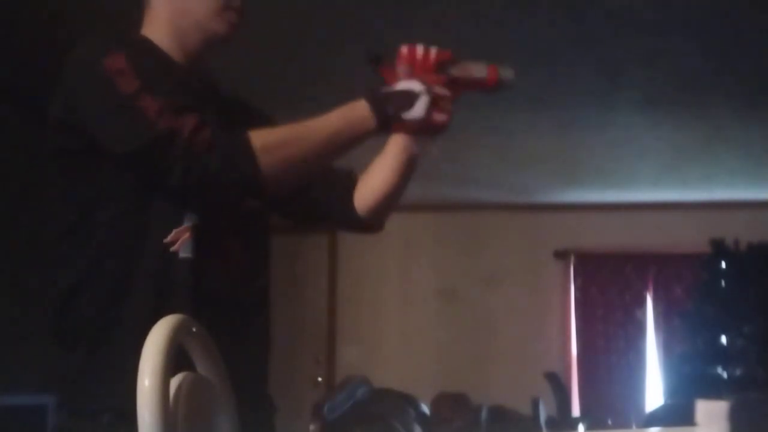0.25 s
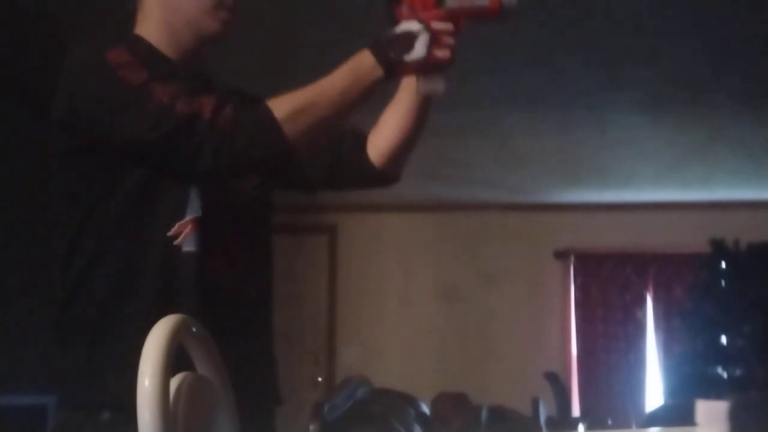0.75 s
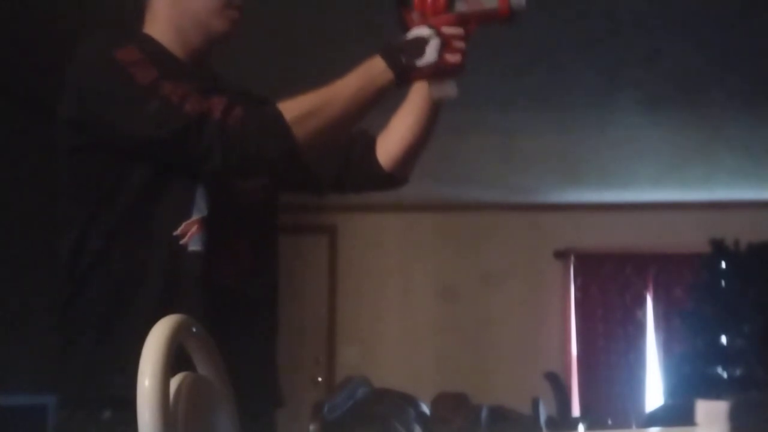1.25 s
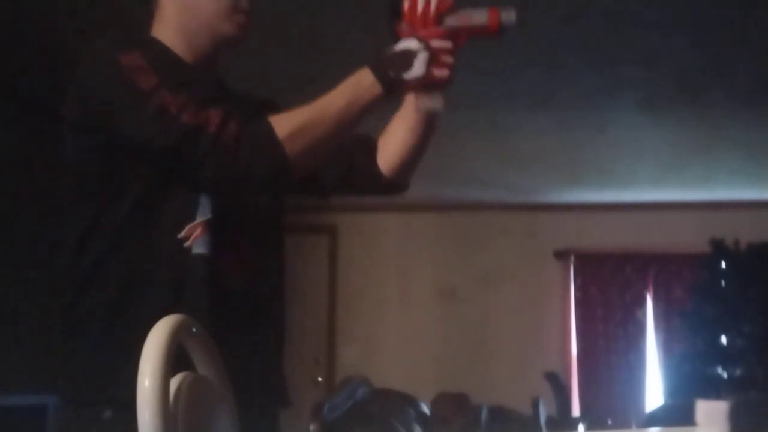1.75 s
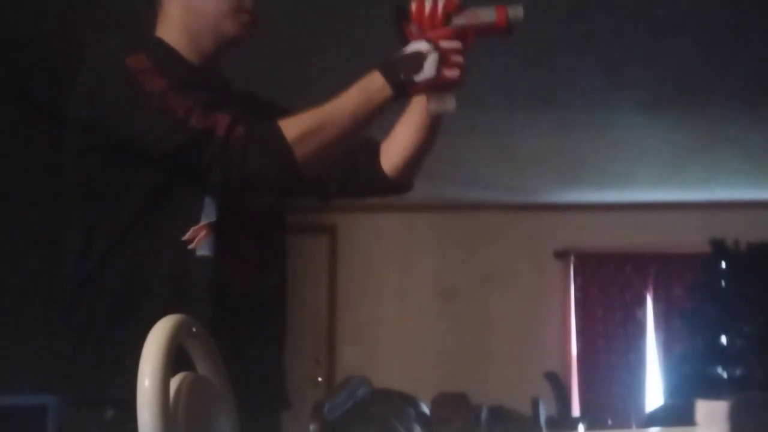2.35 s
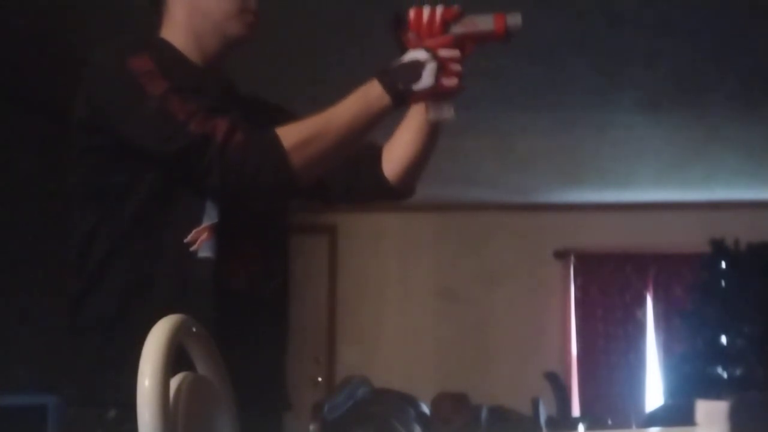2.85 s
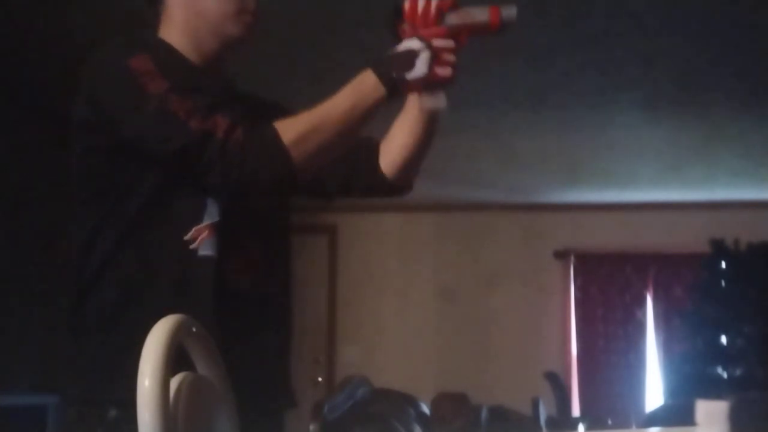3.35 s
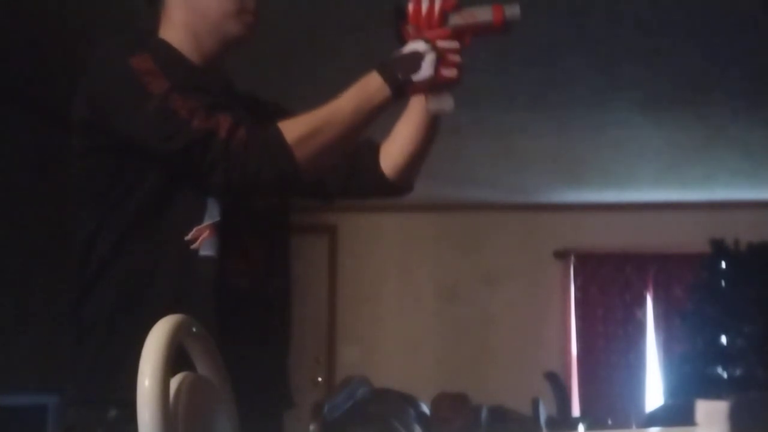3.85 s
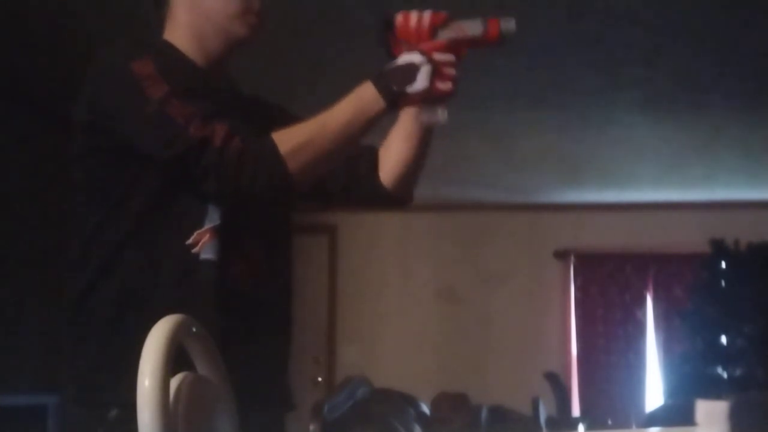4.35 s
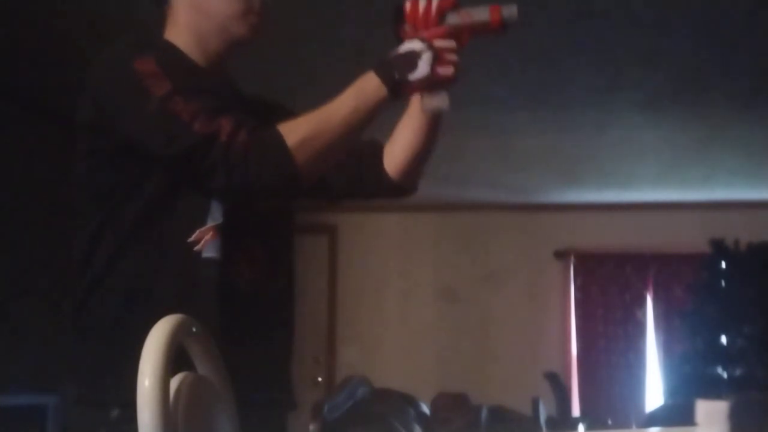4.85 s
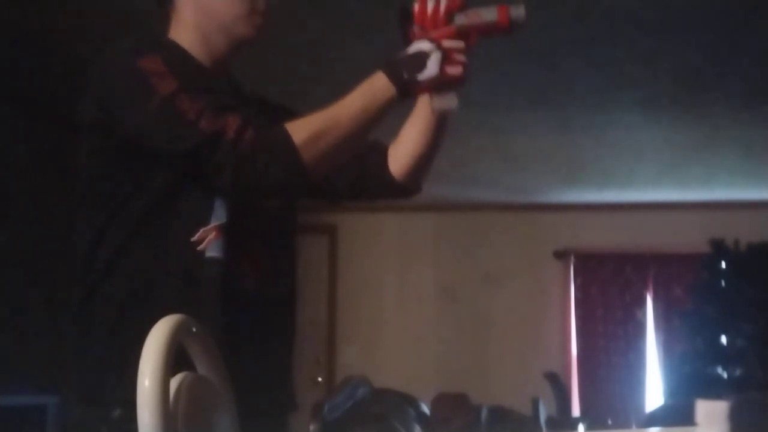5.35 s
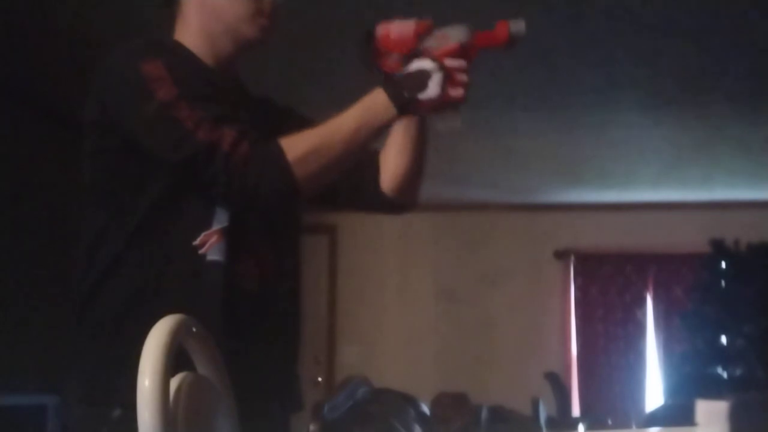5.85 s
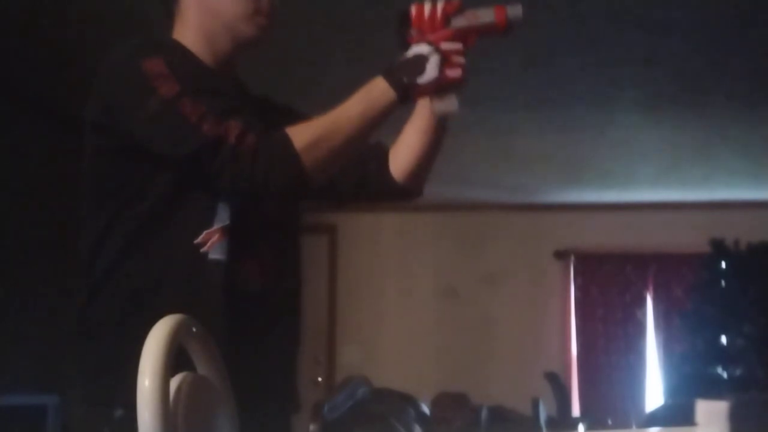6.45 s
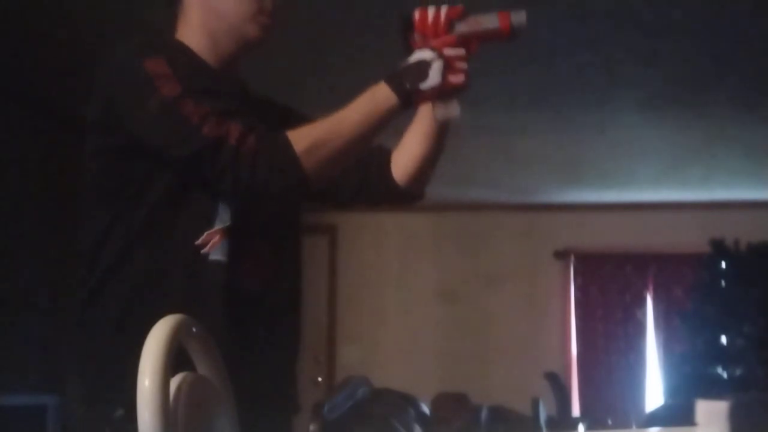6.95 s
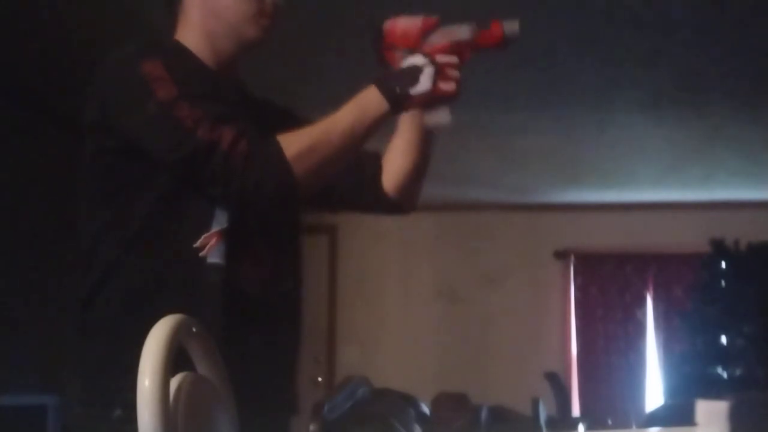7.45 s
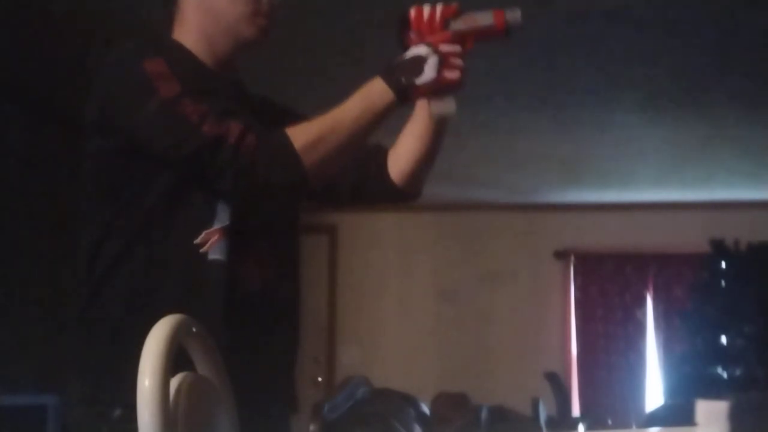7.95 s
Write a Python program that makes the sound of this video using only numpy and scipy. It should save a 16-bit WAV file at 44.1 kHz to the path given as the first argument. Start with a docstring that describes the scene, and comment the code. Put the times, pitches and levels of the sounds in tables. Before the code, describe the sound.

Repeated firing and cocking of a plastic toy blaster, heard nearby with short lively room echo. The opening catches the tail of a shot; five more follow, the last much weaker. Between them come high scratchy squeaks, small snags, dull hand knocks and bright hollow slide clacks, the loudest sounds. A small click ends it over a very quiet low room hum.

```python
"""Spring-powered toy blaster in a small room

A blaster is fired and re-cocked about every 1.4 s in a small, quiet room. Each cycle: the trigger clicks,
the plunger pops a dart out, the slide is pulled back with a rising squeak, then runs forward and clacks home.
Hits are filtered noise bursts with ringing modes; squeaks are unsteady tones whose pitch follows slide speed.
The muzzle points at a wall, so the pops are heard mostly through the room; a faint rumble and hum lie below."""
import sys
import numpy as np
from scipy import signal
from scipy.fft import rfft, irfft
from scipy.io import wavfile
from scipy.ndimage import uniform_filter1d

SR = 44100
rng = np.random.default_rng(int(sys.argv[2]) if len(sys.argv) > 2 else 0)


def materialize(psi):
    """Save the field psi as 16-bit PCM at rate SR to the path in sys.argv[1].

    A 1-D psi becomes a single channel; in a 2-D psi each row is a channel.
    """
    bounded = np.clip(np.atleast_2d(psi).T, -1, 1)
    quanta = np.round(bounded * 32767).astype(np.int16)
    wavfile.write(sys.argv[1], SR, quanta)


N = 361619  # samples in the scene
LEAD = SR // 5  # samples ahead of the scene, for sounds already under way when it starts
PRE = 32  # samples of room response ahead of the direct sound
# pitch follows speed over a fixed travel, so a push lasts this many cycles of its top pitch
PUSH_CYCLES = 645


def shot(db, rattle_db, tilt_db, pop_tilt_db, slam_s=.0042, slam_db=2, ring_db=-9):
    """Impulsive excitation: an air pulse pops and rings the tube; the spring rattles and the plunger slams."""
    # spectrum of the air pulse in barrel and plunger tube: [f/Hz, level/dB]
    pop_spectrum = [(25, -56), (55, -35.5), (85, -4.5), (150, -9.5), (200, -11.5), (300, -16), (390, -6),
                    (470, -9), (570, -2.5), (660, -3.5), (780, -7), (920, -4.5), (1300, -25.5), (3000, -42)]
    # ringing of the plunger tube and spring: [f/Hz, level/dB, t60/s]
    tube_modes = [(160.6, -11.5, 0.33), (390.6, -8.5, 0.31), (523, 2, 0.033), (640, 4.5, 0.038),
                  (923, -7.5, 0.13), (2190, -11, .06), (2690, -10, 0.069), (3700, -13.5, 0.025)]
    # spectrum of the spring and plunger rattle: [f/Hz, level/dB]
    rattle_spectrum = [(200, -21), (700, -10), (1200, 7), (1700, 1), (2100, 5.5), (2500, 1.5), (3500, -1.5),
                       (4100, -6), (5200, -6), (8000, -16), (11500, -23), (15500, -17)]

    puff = contact(.008, -15.0)
    pop = unit(colour(puff, pop_spectrum, pop_tilt_db))
    pop = pop + from_db(ring_db) * ring(puff, tube_modes)
    slam = delayed(contact(0.032, 6.6), slam_s)
    rattle = contact(0.0038, 2.6) + from_db(slam_db) * slam
    rattle = colour(rattle, rattle_spectrum, tilt_db)
    return blow(pop, db) + blow(rattle, db + rattle_db)


def clack(db, tilt_db, ring_db=-10, bounce_s=0.004, bounce_db=-4):
    """Impact with one rebound: the slide strikes the hollow shell, whose modes ring briefly."""
    # spectrum of the shell when the slide slams: [f/Hz, level/dB]
    shell_spectrum = [(25, -64.5), (70, -39), (300, -27), (480, -17), (600, -10.5), (740, -16),
                      (1100, -3.5), (1300, -9), (1800, -0.5), (2300, -7.5), (2800, -13), (4900, -16.5),
                      (7300, -26.5), (11000, -37.5), (15000, -32.5)]
    # ringing of the shell: [f/Hz, level/dB, t60/s]
    shell_modes = [(578, -9, 0.28), (1050, -27.5, .04), (1458, 10.5, 0.15), (1630, 2, 0.032),
                   (1900, -2.5, 0.047), (2773, 5.5, 0.067), (3740, -7.5, 0.026)]

    bounce = delayed(judder(), bounce_s * rng.uniform(.85, 1.15))
    hit = even(judder() + from_db(bounce_db) * bounce, width_bins=3)
    body = unit(colour(hit, shell_spectrum, tilt_db))
    return blow(body + from_db(ring_db) * ring(hit, shell_modes), db)


def judder(rise_s=0.00056, decay_s=0.0034):
    """Random micro-impacts: a dense run of contacts as two plastic faces seat against each other."""
    t = seconds(1 / 8)
    return even(rng.standard_normal(len(t)) * (1 - np.exp(-t / rise_s)) * np.exp(-t / decay_s))


def pull(top_hz, squeak_db, whistle_db, rub_db):
    """Stick-slip at rising speed: the squeak climbs, then jumps to a short steady whistle of the seal."""
    travel_s = 580 / top_hz  # a fixed travel lasts this many cycles of the top pitch
    start_hz, reach = 1060, .88  # initial pitch; share of the top pitch at the end of the travel
    swell_db, loudest, ease_db = 15.5, .3, 4  # swell up to this share of the travel, then easing off
    whistle_s, attack_s, fade_db_per_s = .04, 0.0024, 650

    t = seconds(travel_s + whistle_s)
    pitch = np.interp(t, [0, travel_s], [start_hz, reach * top_hz])
    effort_db = np.interp(t / travel_s, [0, loudest, 1], [-swell_db, 0, -ease_db])
    held_s = np.maximum(t - travel_s, 0)
    arrived = np.minimum(held_s / attack_s, 1)
    whistle = strand(np.full(len(t), 1. * top_hz), drift=0.02)
    whistle = whistle * from_db(whistle_db - fade_db_per_s * held_s)
    tone = (1 - arrived) * squeak(pitch, squeak_db + effort_db) + arrived * whistle
    rub = rails(len(t), top_hz, rub_db, swell_db=18)
    return (tone + rub) * signal.windows.tukey(len(t), .06)


def push(top_hz, squeak_db, rub_db):
    """Stick-slip at uneven speed: a chirp as the slide is nudged loose, a hesitation, a squeaking run home."""
    # course of a push: [share of its duration, share of top speed, squeak level/dB]
    course = [(0, .17, -6.5), (.1, .33, -1), (.2, .42, -3.5), (.38, 0.24, -11), (.58, .53, -8.5),
              (.74, .82, -1), (.86, 1, -1), (1, .94, -0.5)]

    t = seconds(PUSH_CYCLES / top_hz)
    share, speed, effort_db = np.transpose(course)
    way = t / t[-1]
    pitch = top_hz * np.interp(way, share, speed)
    tone = squeak(pitch, squeak_db + np.interp(way, share, effort_db))
    rub = rails(len(t), top_hz, rub_db, swell_db=16.5)
    return (tone + rub) * signal.windows.tukey(len(t), .06)


def squeak(pitch, db, body_hz=2710, body_octaves=0.27, boost_db=4.5):
    """Resonant radiation: two patches of the seal squeak together, boosted near the shell's resonance."""
    body_db = boost_db / (1 + (np.log2(pitch / body_hz) / body_octaves) ** 2)
    return (strand(pitch) + strand(pitch)) / np.sqrt(2) * from_db(db + body_db)


def strand(pitch, jitter=.035, drift=.025, flutter_db=4, second_db=-12, third_db=-24):
    """Stick-slip oscillation of one patch of the seal: an unsteady tone with weak overtones."""
    n = len(pitch)
    unsteady = jitter * wobble(n, 2500) + drift * wobble(n, 300)
    pitch = pitch * (1 + np.sqrt(5000 / pitch) * unsteady)  # low pitches waver more
    phase = 2 * np.pi * np.cumsum(pitch) / SR
    tone = 0
    for k, db in enumerate([0, second_db, third_db], 1):
        rolloff = 1 + (k * pitch / 9500) ** 8  # partials weaken steeply above 9500 Hz
        tone = tone + from_db(db) * np.sin(k * phase) / rolloff
    return tone * from_db(flutter_db * wobble(n, 400))


def rails(length, top_hz, rub_db, swell_db, grain_db=5):
    """Sliding friction: grainy noise as the rails rub harder and harder, and brighter on a fast stroke."""
    # spectrum of the rubbing rails: [f/Hz, level/dB]
    rail_spectrum = [(40, -53), (300, -9.5), (600, 2), (1200, 3.5), (2500, 0), (6000, -20), (8000, -26.5),
                     (11000, -36), (15000, -22)]

    grains = rng.standard_normal(length) * from_db(grain_db * wobble(length, 700))
    tilt_db = 0.5 + 3 * np.log2(top_hz / 7000)  # dB per octave; rises by 3 when the top speed doubles
    rub = unit(colour(grains, rail_spectrum, tilt_db)) * np.sqrt(length)
    return rub * from_db(rub_db - swell_db * np.linspace(1, 0, length) ** 2)


def trigger(db, gap_s, second_db, tilt_db, ring_db=-5):
    """Double impact: two small contacts in quick succession set the light parts ringing."""
    # spectrum of the trigger parts: [f/Hz, level/dB]
    catch_spectrum = [(25, -49), (100, -29.5), (400, -10.5), (720, -11), (930, 6), (1250, -0.5),
                      (2000, -6.5), (2700, -5.5), (4500, -13), (7000, -25.5), (11000, -35), (14500, -26.5)]
    # ringing of the trigger parts: [f/Hz, level/dB, t60/s]
    catch_modes = [(955, 6, 0.027), (2020, -11, .03), (2646, -3.5, 0.04), (3470, -13, 0.1)]

    first = contact(0.00095, 6.2)
    second = delayed(contact(0.0027, 4.8), gap_s)
    hit = even(first + from_db(second_db) * second, width_bins=9)
    click = unit(colour(hit, catch_spectrum, tilt_db)) + from_db(ring_db) * ring(hit, catch_modes)
    return blow(click, db) * np.hypot(1, from_db(second_db))  # the energies of both steps add


def knock(db, body_hz):
    """Damped impact: a padded blow, dull above its body resonance."""
    # spectrum of a padded knock: [multiple of the body frequency, level/dB]
    knock_spectrum = [(.05, -38.5), (.15, -24), (.4, -9), (.8, 1), (1.15, 2), (1.8, -10), (3.5, -19),
                      (8, -29), (16, -48)]

    points = [(ratio * body_hz, level) for ratio, level in knock_spectrum]
    return blow(colour(contact(0.001, -10.5), points), db)


def contact(decay_s, chatter_db):
    """Impulse plus decaying noise: one sharp contact, then the dying chatter of loose parts."""
    t = seconds(1 / 8)
    x = from_db(chatter_db) * unit(rng.standard_normal(len(t)) * np.exp(-t / decay_s))
    x[0] += 1
    return even(x)


def ring(hit, modes):
    """Modal synthesis: exponentially damped sines set ringing by a hit, at unit energy."""
    t = np.arange(len(hit)) / SR
    tones = 0
    for hz, db, t60 in modes:
        decay = np.exp(-np.log(1000) * t / t60)
        tones = tones + from_db(db) * np.sin(2 * np.pi * hz * t) * decay
    return unit(signal.fftconvolve(hit, tones)[:len(t)])


def blow(x, db):
    """Energy scaling: a hit gets the energy of 10 ms at the given level."""
    return unit(x) * from_db(db) * np.sqrt(SR / 100)


def delayed(x, s):
    """Time shift: the same sound s seconds later, cut to the same length."""
    return np.concatenate([np.zeros(int(s * SR)), x])[:len(x)]


def from_db(db):
    """Logarithmic level: decibels to amplitude gain."""
    return 10 ** (np.asarray(db) / 20)


def unit(x):
    """Energy normalisation: scale to a mean energy of one per channel."""
    return x / np.sqrt(np.mean(np.sum(x ** 2, axis=-1)))


def seconds(length):
    """Sampled time: the time axis in seconds."""
    return np.arange(int(length * SR)) / SR


def wobble(length, rate_hz):
    """Low-passed noise: smooth random variation with a standard deviation of one."""
    width = max(int(SR / rate_hz), 1)
    x = uniform_filter1d(uniform_filter1d(rng.standard_normal(length), width), width)
    return x / x.std()


def colour(x, points, tilt_db=0, size=4096):
    """Minimum-phase filtering through (f/Hz, level/dB) points, tilted in dB per octave."""
    hz, db = np.transpose(points)
    octave = np.log2(np.maximum(np.arange(size // 2 + 1), 1) * SR / size)
    gain = from_db(np.interp(octave, np.log2(hz), db) + tilt_db * octave)
    # folding the cepstrum onto positive times makes the filter causal
    cepstrum = irfft(np.log(gain))
    cepstrum[1:size // 2] *= 2
    cepstrum[size // 2 + 1:] = 0
    response = irfft(np.exp(rfft(cepstrum)))
    return signal.fftconvolve(x, response)[:len(x)]


def even(x, width_bins=5, size=4096):
    """Spectral whitening: level out the spectrum of a burst while it keeps its scatter in time."""
    power = uniform_filter1d(np.abs(rfft(x, size)) ** 2, width_bins) + 1e-12
    inverse = np.column_stack([np.fft.rfftfreq(size, 1 / SR), -10 * np.log10(power)])
    return unit(colour(x, inverse[1:]))  # without 0 Hz


def near_sound(length, scatter_s=0.00064, scatter_db=4):
    """Early reflection: the direct sound and its scattered echoes from uneven surfaces close by."""
    # near surfaces: [delay to the left t/s, delay to the right t/s, level/dB]
    echoes = [(.0013, .0011, 3), (.0041, .0038, -2), (.0066, .0064, -10), (0.0165, .0153, -22.5),
              (0.0355, .0328, -11.5)]

    near = np.zeros((2, length))
    near[:, 1] = 1  # direct sound
    t = seconds(1 / 100)
    for *delays, db in echoes:
        for ear, s in enumerate(delays):
            echo = from_db(scatter_db) * unit(rng.standard_normal(len(t)) * np.exp(-t / scatter_s))
            echo[0] += 1
            start = int(s * SR)
            near[ear, start:start + len(t)] += from_db(db) * unit(echo)
    return np.array([even(ear, width_bins=9) for ear in near])


def build_room(build_s=0.0059, alike_hz=620, left_db=3.5):
    """Diffuse-field reverberation: stereo near response and a tail decaying at its own rate in each band."""
    # the room's diffuse tail: [f/Hz, t60/s, level/dB]
    bands = [(80.5, .5, -7.5), (203, 0.45, 0), (620, 0.35, -1), (1560, 0.37, -2), (4460, 0.36, 2.5),
             (7560, 0.31, 5.5), (9200, 0.24, 5.5), (15100, 0.17, -2)]

    t = seconds(2 / 3)
    hz = np.maximum(np.fft.rfftfreq(len(t), 1 / SR), 1)
    # long waves reach both ports alike, a little stronger on the left
    alike = 1 / (1 + (hz / alike_hz) ** 2)
    sides = np.array([[1], [-1]])
    lean = from_db(sides * left_db * alike / 2)
    mid, side = rfft(rng.standard_normal((2, len(t))))
    field = lean * (mid * np.sqrt(1 + alike) + sides * side * np.sqrt(1 - alike))

    centres, tail = np.log([row[0] for row in bands]), 0
    for pick, (_, t60, db) in zip(np.eye(len(bands)), bands):
        crossfade = np.interp(np.log(hz), centres, pick)
        band = irfft(field * crossfade, len(t))
        tail = tail + from_db(db) * band * np.exp(-np.log(1000) * t / t60)
    tail = tail * (1 - np.exp(-(t / build_s) ** 2))

    # the lean is a zero-phase filter and needs some room ahead of the direct sound
    early = np.roll(near_sound(len(t)), PRE, axis=1)
    near = irfft(rfft(early) * lean, len(t))
    return unit(near), unit(tail)


def add(out, s, x, rooms, room_db):
    """Convolution and superposition: sound x at time s, in the room response drawn for that stretch of time."""
    near, tail = rooms[int(s * SR / N * len(rooms))]
    heard = signal.fftconvolve(x[None], near + from_db(room_db) * tail, axes=1)
    start = max(int(s * SR) + LEAD - PRE, 0)
    out[:, start:start + heard.shape[1]] += heard[:, :out.shape[1] - start]


def background(floor_db=-63.5, side_db=-6, hum_hz=75, hum_db=-72, waver=0.039):
    """Stationary noise: faint room rumble with a trace of hiss, and a frequency-modulated low hum."""
    # spectrum of the steady background: [f/Hz, level/dB]
    floor_spectrum = [(25, -38.5), (50, -15.5), (64, 0), (75, -0.5), (90, -5), (120, -4.5), (175, -3.5),
                      (300, -5), (600, -12.5), (1200, -21.5), (3000, -25.5), (8000, -34.5), (15000, -34.5)]

    mid, side = (unit(colour(rng.standard_normal(N), floor_spectrum)) * np.sqrt(N) for _ in range(2))
    noise = mid + from_db(side_db) * side * np.array([[1], [-1]])
    hum_pitch = hum_hz * (1 + waver * wobble(N, 5))
    hum = np.sin(2 * np.pi * np.cumsum(hum_pitch) / SR)
    return from_db(floor_db) * noise + from_db(hum_db) * hum


def scene():
    """Superposition of shots and cocking strokes; twelve random room responses take turns along the scene."""
    # plunger released: [t/s, pop level/dB, rattle re pop/dB, rattle tilt/(dB per octave), room level/dB,
    # pop tilt/(dB per octave)]
    shots = [(-.075, -16.5, -0.5, 2, 2.5, -2), (1.3253, -21, 1.5, 4.5, 11, 1.5),
             (2.6829, -16.5, -2, 2, 7.5, -0.5), (4.048, -17.5, -1.5, 1.5, 10, 0.5),
             (5.4542, -16.5, -3, 0, 7.5, -.5), (6.856, -31.5, -6, -1, 15.5, -0.5)]
    # slide runs forward and hits its front stop: [t/s of the hit, level/dB, tilt/(dB per octave),
    # room level/dB, pitch at top speed f/Hz, squeak level/dB, rub level/dB]
    clacks = [(0.6361, -11.5, 1.5, 3.5, 8650, -32, -33.5), (1.8165, -12, 1, 3.5, 8860, -34, -33.5),
              (3.3525, -12, 0.5, -2, 6370, -40, -33.5), (4.7879, -12, 0, -1, 6070, -39, -34.5),
              (6.2117, -11, 0.5, -1.5, 6370, -40, -36), (7.5912, -11, 0.5, 0, 7000, -39, -30.5)]
    # slide is pulled back: [t/s, pitch at top speed f/Hz, squeak level/dB, whistle level/dB, rub level/dB]
    pulls = [(.402, 8670, -38.5, -38, -35.5), (1.564, 9100, -33.5, -29, -36), (3.02, 7180, -35, -29, -38),
             (4.432, 5645, -40.5, -23.5, -43.5), (5.865, 6234, -36, -31, -39),
             (7.273, 6640, -37, -29.5, -38)]
    # trigger and catch take up their play in two steps: [t/s, level/dB, gap t/s, second step re first/dB,
    # tilt/(dB per octave)]
    triggers = [(0.339, -26, 0.0033, -12.5, -0.5), (1.1615, -35.5, 0.0048, 2.5, 1),
                (2.5113, -39.5, 0.0025, 5, 1), (3.8697, -34, 0.0053, 5, 0.5), (4.024, -39, 0.0025, -4, 6.5),
                (5.287, -31.5, 0.0042, 4, 0.5), (6.610, -51.5, 0.0048, 10, 1), (6.6886, -36, 0.0041, 3, 2),
                (8.0444, -34, 0.0035, 2.5, 0.5)]
    # slide snags on its rails: [t/s, level/dB]
    snags = [(0.455, -30), (.479, -37), (.492, -36.5), (1.622, -28), (1.640, -31), (3.092, -41),
             (3.121, -44), (3.251, -41.5), (4.535, -33.5), (5.943, -34), (5.974, -32.5), (6.114, -41.5),
             (7.347, -32.5), (7.382, -34.5)]
    # dull knocks of hands and loose plastic: [t/s, level/dB, body f/Hz, room level/dB]
    knocks = [(0.4306, -25, 900, -0.5), (1.004, -36.5, 795, 2.5), (1.012, -41.5, 900, -4),
              (1.8863, -20.5, 452, -3), (2.5426, -35, 900, -0.5), (2.551, -40, 886, -11.5),
              (3.673, -49.5, 704, 3.5), (4.6357, -25.5, 732, 1), (4.6437, -31, 747, -9.5),
              (6.083, -56, 700, 13), (7.4313, -21.5, 430, 1.5), (7.964, -48, 787, -0.5)]

    rooms = [build_room() for _ in range(12)]  # each serves one twelfth of the scene
    out = np.zeros((2, LEAD + N))
    for s, db, rattle_db, tilt_db, room_db, pop_tilt_db in shots:
        add(out, s, shot(db, rattle_db, tilt_db, pop_tilt_db), rooms, room_db)
    for s, db, tilt_db, room_db, top_hz, squeak_db, rub_db in clacks:
        add(out, s - PUSH_CYCLES / top_hz, push(top_hz, squeak_db, rub_db), rooms, room_db=-6.0)
        add(out, s, clack(db, tilt_db), rooms, room_db)
    for s, top_hz, squeak_db, whistle_db, rub_db in pulls:
        add(out, s, pull(top_hz, squeak_db, whistle_db, rub_db), rooms, room_db=-3.5)
    for s, db, gap_s, second_db, tilt_db in triggers:
        add(out, s, trigger(db, gap_s, second_db, tilt_db), rooms, room_db=-3.0)
    for s, db in snags:
        add(out, s, clack(db, tilt_db=1.0), rooms, room_db=-8.5)
    for s, db, body_hz, room_db in knocks:
        add(out, s, knock(db, body_hz), rooms, room_db)
    return out[:, LEAD:] + background()


def record(dry, low_cut_hz=52, top_hz=16000):
    """Band limiting: the small microphone loses the deepest bass; the recorder clips and cuts the top."""
    high_pass = signal.butter(2, low_cut_hz, "high", fs=SR, output="sos")
    low_pass = signal.ellip(8, .2, 70, top_hz, fs=SR, output="sos")
    thin = signal.sosfilt(high_pass, dry)
    return signal.sosfilt(low_pass, np.clip(thin, -1, 1))


dry = scene()
out = record(dry)
materialize(out)
```